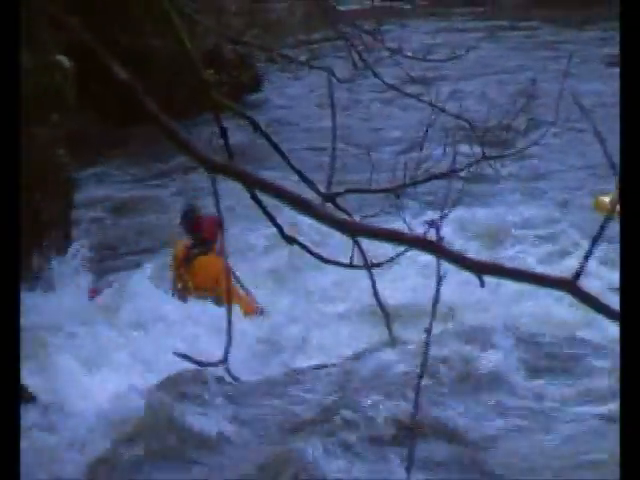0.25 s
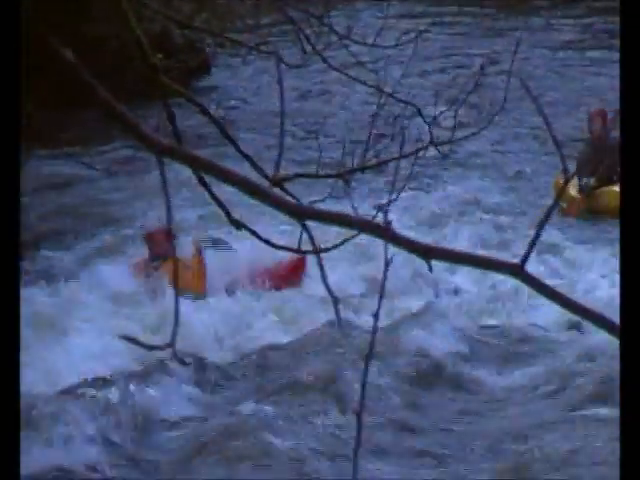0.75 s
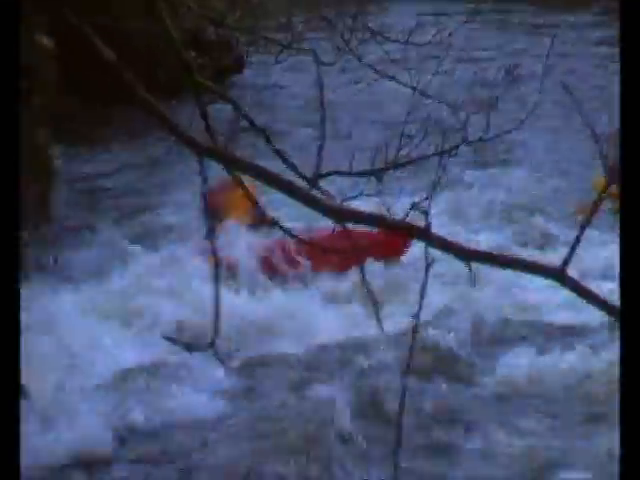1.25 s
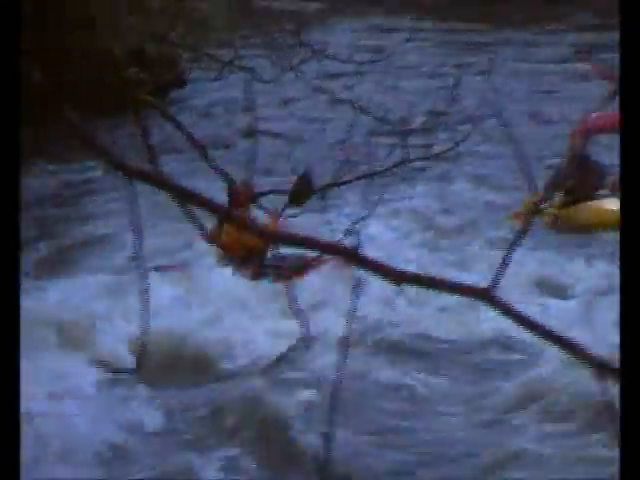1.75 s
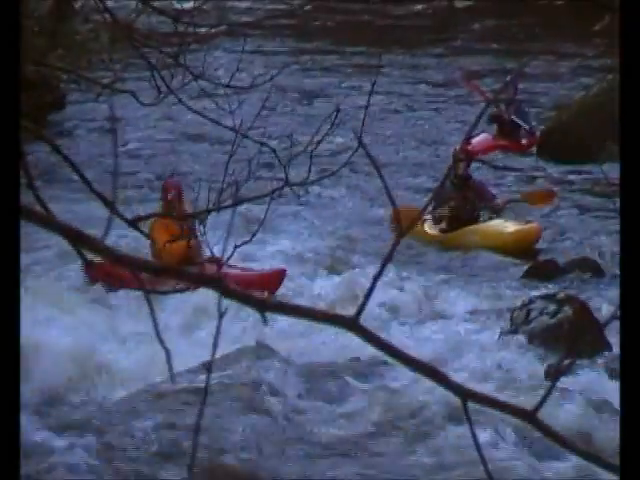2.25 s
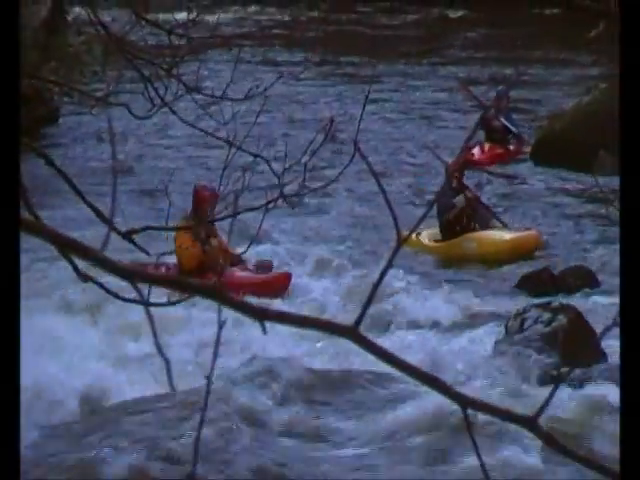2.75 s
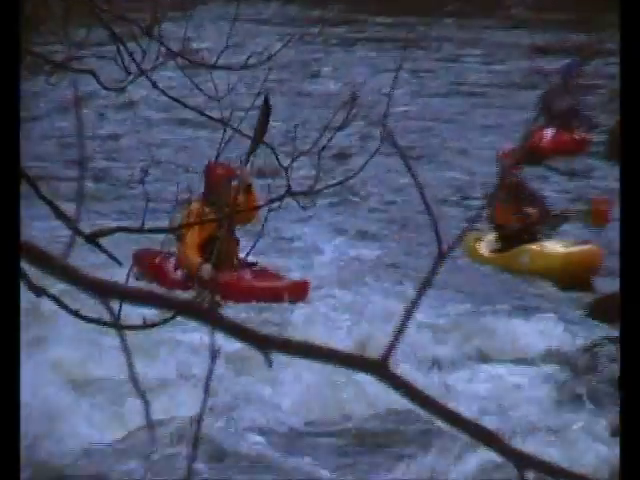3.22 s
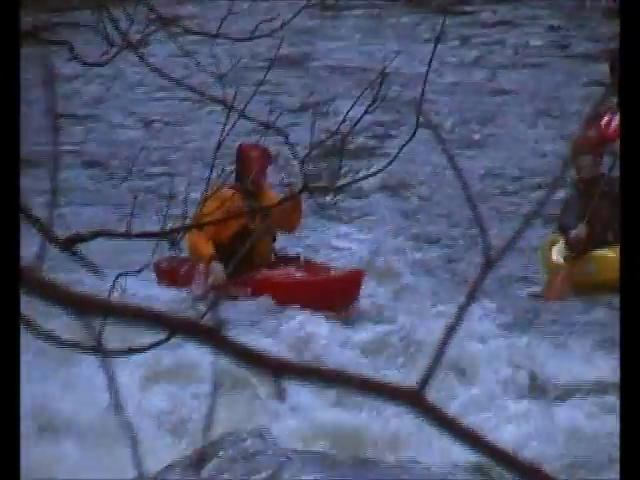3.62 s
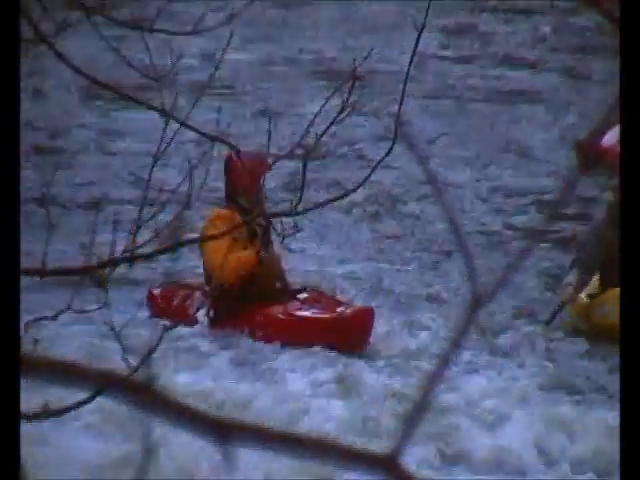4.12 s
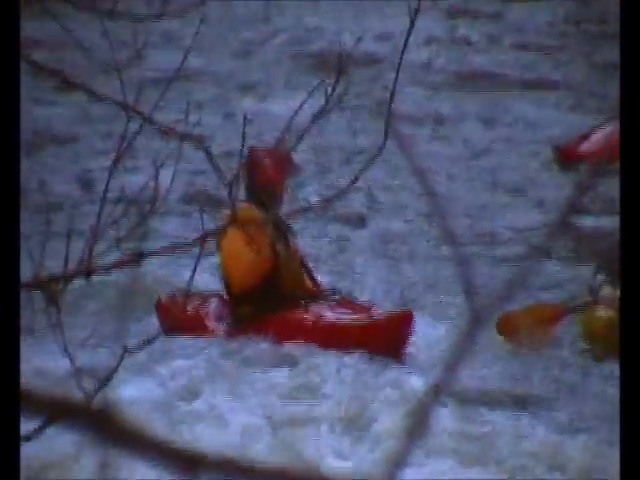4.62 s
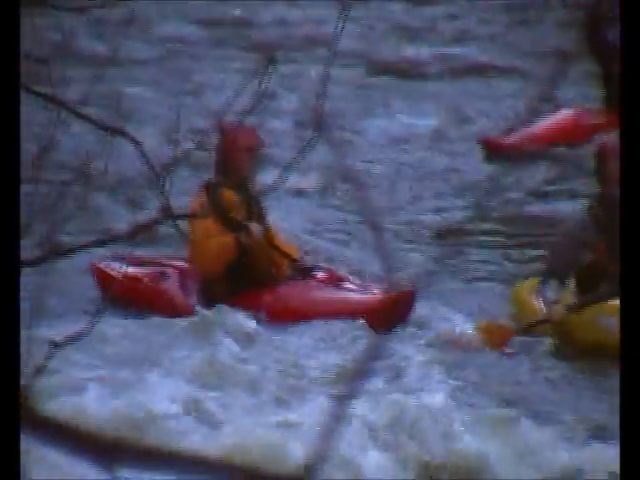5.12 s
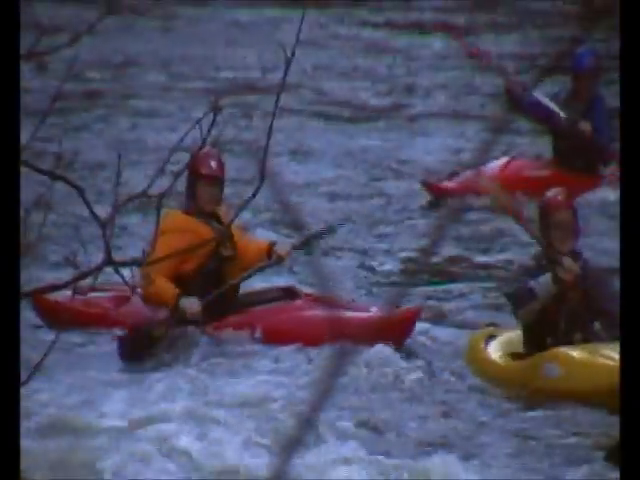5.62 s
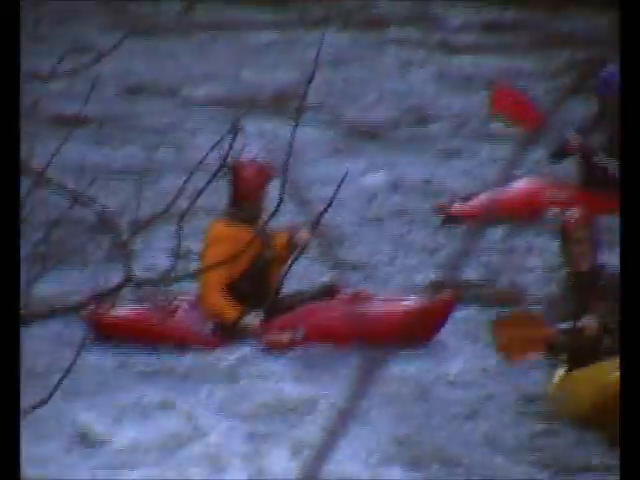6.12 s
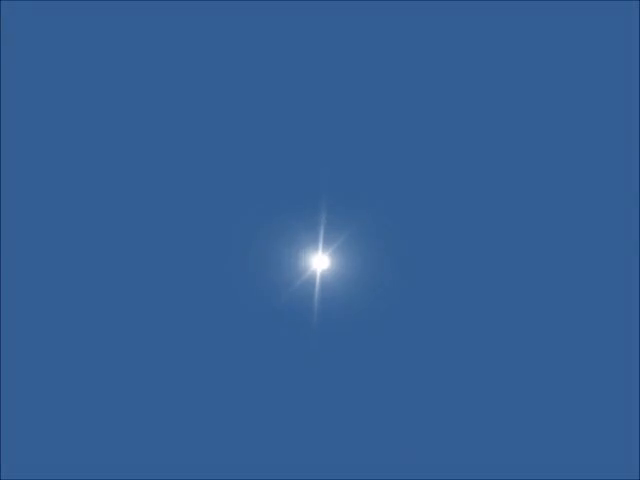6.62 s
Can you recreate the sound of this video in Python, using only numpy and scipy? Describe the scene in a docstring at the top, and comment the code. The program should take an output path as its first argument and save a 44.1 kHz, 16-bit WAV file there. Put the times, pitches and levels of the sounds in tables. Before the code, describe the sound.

White water roars loudly and steadily down a river rapid, surging, bubbling and gurgling, then cuts off suddenly.

```python
"""River rapid from the bank

White water roars in surges at a small stereo camera microphone. Bubbles ring in the foam, hollows
gurgle, air pockets gulp as they close, crests break into spray and one puff of wind brushes the ports.
Now and then a brief sharp peak in the roar trips the limiter of one channel, so the level dips on that
side and creeps back. The sound is cut off suddenly near the end."""
import sys
import numpy as np
from scipy import signal
from scipy.fft import rfft, irfft, next_fast_len
from scipy.io import wavfile
from scipy.ndimage import uniform_filter1d, minimum_filter1d

SR = 44100
rng = np.random.default_rng(int(sys.argv[2]) if len(sys.argv) > 2 else 0)


def generate_wav(signal):
    """Clip the signal to [-1, 1] and save it as 16-bit WAV at the path in sys.argv[1]."""
    frames = np.transpose(np.atleast_2d(signal))
    scaled = np.clip(frames, -1, 1) * 32767
    pcm = np.round(scaled).astype(np.int16)
    wavfile.write(sys.argv[1], SR, pcm)


N = 302959
STOP_S = 6.458
HOP = 128  # samples

# The right microphone port against the left.
# Each row: frequency in Hz, level difference in dB, coherence from 0 to 1, phase lag in radians.
RIGHT_PORT = [(100, 0.4, 0.94, 0.06), (330, 1.2, 0.98, 0.18), (500, 3.6, 0.9, 0.51), (670, -0.2, 0.82, 0.9),
              (840, 2.7, 0.79, 1.29), (1020, -2.1, 0.21, -2.68), (1250, -7.6, 0.51, -0.13),
              (1550, -2.2, 0.66, -0.52), (1900, 2.2, 0.59, 0.43), (2650, -3.6, 0.55, 0.33),
              (3900, 0.1, 0.56, 0.11), (5700, -3.2, 0.82, 0.96), (8500, -8.7, 0.7, 1.57),
              (11000, -20.8, 0.15, 1.03)]


def gain_of(db):
    """Amplitude ratio: tenfold for every 20 dB."""
    return 10 ** (np.asarray(db) / 20)


def unit_rms(x):
    """Normalisation to a mean power of 1."""
    return x / np.sqrt(np.mean(x ** 2) + 1e-20)


def curve_at(table, hz, column=1):
    """Linear interpolation of one column over log frequency."""
    table = np.asarray(table)
    return np.interp(np.log(hz + 1), np.log(table[:, 0] + 1), table[:, column])


def churn(patch_db, flicker_db):
    """Incoherent summation: countless splashes merge into noise, with faint patches and flicker."""
    frames = dict(nperseg=4 * HOP, noverlap=3 * HOP)
    spectra = signal.stft(rng.standard_normal((2, N)), **frames)[2]
    patches, flicker = rng.standard_normal((2, *spectra.shape[1:]))
    patches = unit_rms(uniform_filter1d(uniform_filter1d(patches, 7, axis=0), 22, axis=1))  # narrow
    flicker = unit_rms(uniform_filter1d(uniform_filter1d(flicker, 60, axis=0), 5, axis=1))  # wide, brief
    spectra *= gain_of(patch_db * patches + flicker_db * flicker)
    return unit_rms(signal.istft(spectra, **frames)[1][:, :N])


def bubbles(per_s, spread_db, cycles, rise, low_hz, high_hz, sizes):
    """Damped resonance: each bubble rings a few cycles, rising in pitch as it nears the surface."""
    out = np.zeros((2, N))
    for hz in np.geomspace(low_hz, high_hz, sizes):
        age = np.arange(0, 5 * cycles / hz, 1 / SR) * hz / cycles  # in decay times
        ring = np.exp(-age) * np.sin(2 * np.pi * cycles * age * (1 + rise * age))
        onsets = rng.integers(0, N, (2, int(per_s * STOP_S / sizes) + 1))
        strength = gain_of(spread_db * np.minimum(rng.exponential(1, onsets.shape), 4))
        births = np.zeros((2, N))
        np.put_along_axis(births, onsets, strength * hz, 1)  # equal power in every Hz
        out += signal.oaconvolve(births, ring[None], axes=1)[:, :N]
    return unit_rms(out)


def impacts(per_s, spread_db):
    """Shot noise: falling water strikes at random, in many small impulses and a few large."""
    strength = gain_of(spread_db * np.minimum(rng.exponential(1, (2, N)), 4.5))
    return strength * rng.choice([-1, 1], (2, N)) * (rng.random((2, N)) < per_s / SR)


def splashes(per_s, spread_db, decay_s):
    """Exponential decay: each crest slaps down sharply and its power dies in a fizz of droplets."""
    t = np.arange(SR // 4) / SR
    power = signal.oaconvolve(impacts(per_s, spread_db)[0] ** 2, np.exp(-t / decay_s))[:N]
    return unit_rms(np.sqrt(abs(power)) * rng.standard_normal((2, N)))


def surge(water, steady_s):
    """Amplitude modulation: the flow never lets up, but four bands swell and sink about its mean."""
    # Slow surging. Each row: time in seconds, then gains in dB of rumble, plunge, gush and foam.
    swells = [(0.0, -5, -2.1, -0.4, 0), (0.18, -0.2, 0.5, -0.5, -0.1), (0.34, -3, -3.5, -0.2, 0),
              (0.61, 4.5, 0.5, 2, 1), (0.85, -0.7, -0.3, 0.8, 1), (1.13, -0.3, 1.0, -0.7, 0.6),
              (1.24, 1, -1.0, 2, 0.6), (1.37, 2, 2, -0.2, 0.8), (1.53, 0.2, -1, 2, 0.4),
              (1.8, 3, 1.5, -0.5, 1), (2.04, -0.7, -0.3, 1.3, 0.4), (2.32, 0, 0.8, -0.5, 0),
              (2.6, -0.3, -0.5, 0.0, 0.3), (2.75, -3.5, -0.0, -1, 1), (2.96, 0, 0.2, -0.9, 1.1),
              (3.2, 1.5, -3, 1.7, 0.4), (3.36, 2.0, -1.5, -3.0, -0.8), (3.58, -3, -1.7, 1.1, 0.5),
              (3.9, 1, 1.0, 2.3, 0.5), (4.08, -3, 0.6, -1.1, 0.5), (4.22, 1.8, 2.5, 0.5, 1),
              (4.42, -3.5, -0.3, -0.5, 0.3), (4.72, 3, -1.5, 0.3, 0.5), (5.0, 0.5, -0.2, -0.3, 0.3),
              (5.28, 1.9, -2.5, 0, 0.3), (5.48, -1, -1.5, -0.8, 0.4), (5.7, 0, 0.2, -0.2, 0.5),
              (6.0, -1.3, 0, 0.4, 0.5), (6.22, -2, 0, -0.7, -0.4), (6.44, -3.5, -0.5, -1.5, -1.3)]
    # The frequencies in Hz at which those four gains apply.
    band_hz = [90, 290, 630, 1300]
    frames = dict(nperseg=8 * HOP, noverlap=6 * HOP)
    hz, t, spectra = signal.stft(water, SR, **frames)
    power = uniform_filter1d(abs(spectra) ** 2, 7, axis=1)
    power = uniform_filter1d(power, max(round(steady_s / t[1]), 1), axis=2) + 1e-12
    spectra *= np.sqrt(power.mean(axis=2, keepdims=True) / power)  # evens out chance swells
    times, *levels = np.transpose(swells)
    share = np.array([np.interp(np.log(hz + 1), np.log(band_hz), row) for row in np.eye(len(levels))])
    swell_db = share.T @ np.array([np.interp(t, times, level) for level in levels])
    return signal.istft(spectra * gain_of(swell_db), **frames)[1][:, :N]


def roar_at_ports(water):
    """Partial coherence: the roar, coloured by resonances, is alike at both ports mainly in the bass."""
    # The water's spectrum at the left port. Each row: frequency in Hz, relative spectrum level in dB.
    colour = [(20, -42), (40, -19.5), (70, -9.5), (190, -0.5), (340, 0), (560, -4.5), (820, -4.0),
              (1200, -6), (2400, -10), (4600, -12.5), (5600, -12.5), (6800, -13.5), (9500, -14),
              (11000, -17), (11800, -28)]
    # Hollow resonances in the roar. Each row: centre in Hz, width in Hz, boost in dB.
    resonances = [(201, 50, 0.5), (340, 81, 0.9), (815, 60, 1.3), (1134, 110, 2.5), (1900, 750, 1.43),
                  (3080, 250, 1.7)]
    size = next_fast_len(N)
    hz = np.fft.rfftfreq(size, 1 / SR)
    hollow_db = sum(db / (1 + (2 * (hz - centre) / width) ** 2) for centre, width, db in resonances)
    left, independent = rfft(water, size) * gain_of(curve_at(colour, hz) + hollow_db)
    port_hz, _, coherence, lag = np.transpose(RIGHT_PORT)
    shared = np.interp(np.log(hz + 1), np.log(port_hz + 1), coherence * np.exp(-1j * lag))
    right = shared * left + np.sqrt(1 - abs(shared) ** 2) * independent
    right *= gain_of(curve_at(RIGHT_PORT, hz))
    return unit_rms(irfft(np.array([left, right]), size)[:, :N])


def gurgles(level_db, waver_hz):
    """Cavity resonance: a hollow under the wave rings on a wavering note, later and louder at right."""
    # Ringing hollows. Each row: peak time in seconds, relative level in dB, pitch in Hz,
    # half-length in seconds.
    hollows = [(0.5, -29.5, 822, 0.09), (0.82, -26, 812, 0.11), (1.13, -23, 799, 0.07),
               (1.56, -26.5, 835, 0.08), (3.0, -25.5, 834, 0.09), (3.22, -27, 824, 0.06),
               (3.63, -24.5, 819, 0.09), (3.88, -25.5, 827, 0.06), (5.3, -26, 803, 0.06),
               (5.98, -27.5, 830, 0.066)]
    out, t = np.zeros((2, N)), np.arange(N) / SR
    waver = unit_rms(uniform_filter1d(rng.standard_normal(N), 1000))
    for peak_s, db, hz, half_s in hollows:
        near = abs(t - peak_s) < 3 * half_s
        phase = 2 * np.pi * np.cumsum(hz + waver_hz * waver[near]) / SR
        lag = curve_at(RIGHT_PORT, hz, column=3)
        right = gain_of(curve_at(RIGHT_PORT, hz)) * np.sin(phase - lag)
        envelope = gain_of(db + level_db) * np.exp(-((t[near] - peak_s) / half_s) ** 2)
        out[:, near] += envelope * np.array([np.sin(phase), right])
    return out


def gulps(level_db, swell_s):
    """Volume oscillation: a large air pocket closes under the wave and booms for a few cycles."""
    # Closing air pockets. Each row: start in seconds, relative peak level in dB, pitch in Hz.
    pockets = [(0.609, -2.5, 364), (0.719, -9, 430), (1.14, -13, 413), (1.314, -6, 339), (1.385, -9, 328),
               (1.584, -9, 403), (1.843, -4.5, 313), (2.825, -8.5, 333), (2.917, -8.5, 233),
               (3.361, -11, 408), (3.451, -13, 388), (4.127, -12, 293), (4.432, -9, 335),
               (4.692, -8.5, 261), (4.8, -6, 365), (5.61, -8, 382), (5.785, -10.5, 242), (5.894, -5.5, 317)]
    out, t = np.zeros(N), np.arange(SR // 16) / SR
    envelope = (t / swell_s * np.exp(1 - t / swell_s)) ** 2
    for (start_s, db, hz), phase in zip(pockets, rng.random(len(pockets))):
        boom = gain_of(db + level_db) * envelope * np.sin(2 * np.pi * (hz * t + phase))
        start = round(start_s * SR)
        out[start:start + len(boom)] += boom
    return out


def sprays(level_db, band_hz, fall_s):
    """Band noise: a near crest's hiss builds up and collapses at once, nearly alike at both ports."""
    # Breaking crests. Each row: peak time in seconds, relative level in dB, rise constant in seconds.
    crests = [(0.612, -5.5, 0.02), (1.098, -6, 0.025), (2.958, -3.5, 0.035), (3.724, -6, 0.02),
              (3.957, -1.5, 0.028), (5.57, -5.5, 0.03)]
    t = np.arange(N) / SR
    swell = sum(gain_of(db) * np.exp(-np.maximum((peak_s - t) / rise_s, (t - peak_s) / fall_s))
                for peak_s, db, rise_s in crests)
    band = signal.butter(2, band_hz, "bandpass", fs=SR, output="sos")
    hiss = signal.sosfilt(band, rng.standard_normal((3, N)))
    return gain_of(level_db) * swell * unit_rms(hiss[:2] + 2 * hiss[2])


def wind_puff(peak_s, level_db, rise_s, fall_s, top_hz):
    """Turbulent pressure: a soft low buffet rises and falls once, partly different at each port."""
    eddies = signal.sosfilt(signal.butter(2, top_hz, fs=SR, output="sos"), rng.standard_normal((3, N)))
    t = np.arange(N) / SR - peak_s
    envelope = gain_of(level_db) * np.exp(-np.maximum(-t / rise_s, t / fall_s))
    return envelope * unit_rms(eddies[:2] + 1.9 * eddies[2])


def sharp_peaks():
    """Transients: brief sharp peaks in the roar, stronger at one port; most trip its limiter."""
    # Peaks in the roar. Each row: time in seconds, left and right levels in dB ahead of the limiter,
    # pulse width in seconds.
    pulses = [(0.766, 1.5, -16, .00006), (1.174, 3, -17, 0.000051), (1.85, -13, 4, 0.00018),
              (1.917, 3.5, -17, 0.00005), (2.511, 2.4, -18, 0.000054), (2.977, 2.6, -9, 0.000047),
              (3.958, 3, -19, 0.000055), (3.997, -18, -9, 0.000066), (4.136, 3.5, -19, 0.000055),
              (4.157, -15, 2, 0.000066), (5.453, 1.5, -17, 0.00006), (5.802, -16, 4, 0.00008),
              (6.068, 2, -16, .00006)]
    out, t = np.zeros((2, N)), np.arange(N) / SR
    for peak_s, left_db, right_db, width_s in pulses:
        near = abs(t - peak_s) < .005
        offset = (t[near] - round(peak_s * SR) / SR) / width_s
        pressure = (1 - 2 * offset ** 2) * np.exp(-offset ** 2)
        out[:, near] += gain_of([[left_db], [right_db]]) * pressure
    return out


def limiter(x, threshold_db, share, hold_s):
    """Gain reduction: a peak cuts its channel by a share of its excess; the gain holds, then recovers."""
    # Recovery rates of the gain in dB per second: left, then right.
    recovery_rates = [11.5, 5.5]
    cut_db = share * np.maximum(20 * np.log10(abs(x) + 1e-9) - threshold_db, 0)
    half = round(hold_s * SR / 2)
    held_db = -minimum_filter1d(-cut_db, 2 * half + 1, axis=1, origin=half)
    recovered_db = np.outer(recovery_rates, np.arange(N) / SR)
    return x * gain_of(recovered_db - np.maximum.accumulate(held_db + recovered_db, axis=1))


def scene():
    """Superposition: the surging roar, single water sounds and the wind add at the two ports."""
    water = churn(patch_db=0.74, flicker_db=-0.14)
    foam = bubbles(per_s=3500, spread_db=2.5, cycles=7, rise=0.013, low_hz=249.9, high_hz=9990, sizes=36)
    glugs = bubbles(per_s=35, spread_db=2, cycles=3.2, rise=0.01, low_hz=209, high_hz=486, sizes=10)
    fizz = splashes(per_s=70, spread_db=2.5, decay_s=0.013)
    drops = unit_rms(impacts(per_s=1300, spread_db=4))
    water += gain_of(-10) * foam + gain_of(-25.5) * glugs + gain_of(-8.5) * fizz + gain_of(-12.5) * drops
    mix = gain_of(-13.5) * roar_at_ports(surge(water, steady_s=0.21))
    mix += sprays(level_db=-20, band_hz=[3500, 5200], fall_s=0.0064)
    mix += gurgles(level_db=-1, waver_hz=13)
    mix += gulps(level_db=-5, swell_s=0.005)
    mix += wind_puff(peak_s=0.7, level_db=-35, rise_s=0.15, fall_s=0.2, top_hz=44.9)
    return mix + sharp_peaks()


def record(dry):
    """Limiting and soft saturation tame the peaks; a sudden cut and a low-pass filter follow."""
    limited = limiter(dry, threshold_db=-0.5, share=0.66, hold_s=0.082)
    rounded = limited / (1 + (limited / .93) ** 8) ** (1 / 8)
    running = np.arange(N) / SR < STOP_S
    low_pass = signal.firwin(511, cutoff=11950, window=("kaiser", 9), fs=SR)
    return signal.oaconvolve(rounded * running, low_pass[None], "same")


dry = scene()
out = record(dry)
generate_wav(out)
```